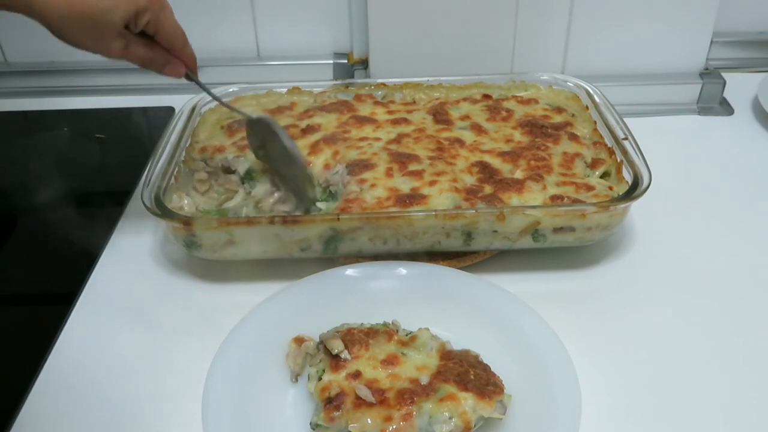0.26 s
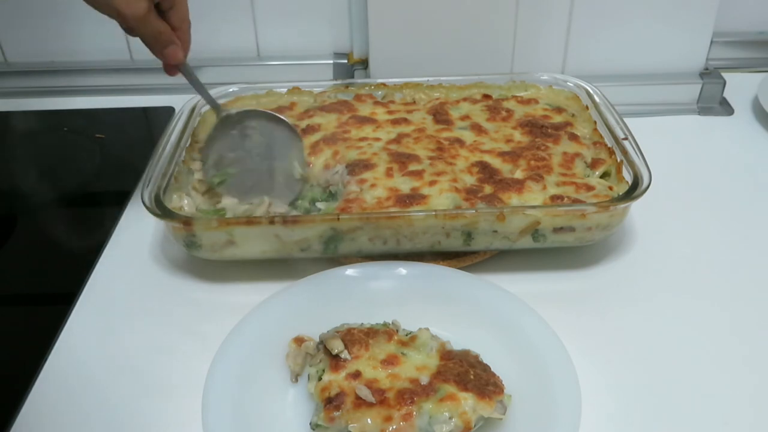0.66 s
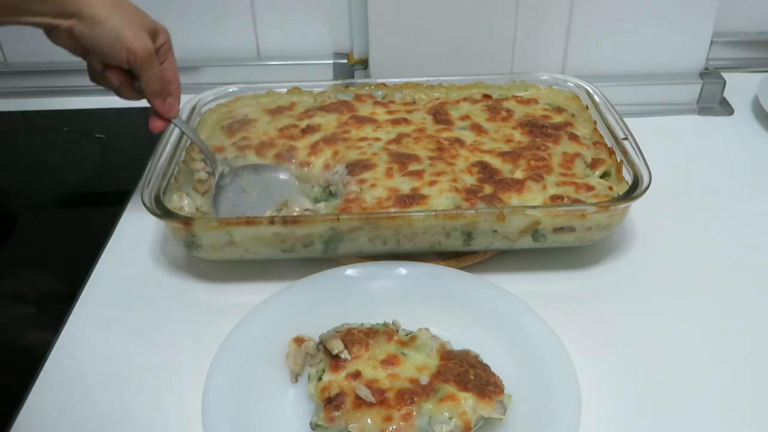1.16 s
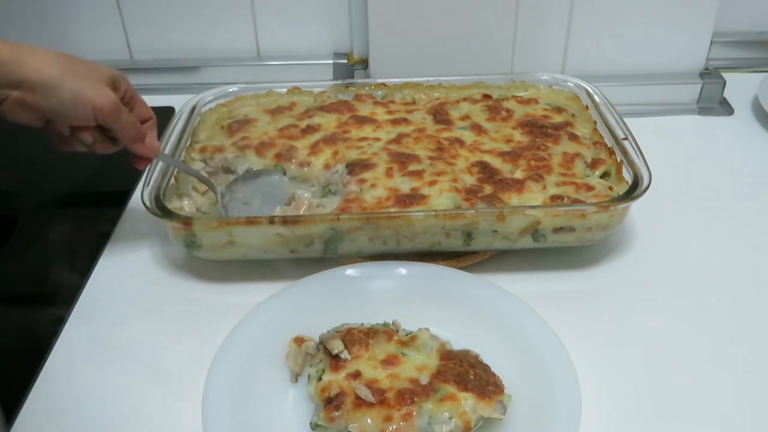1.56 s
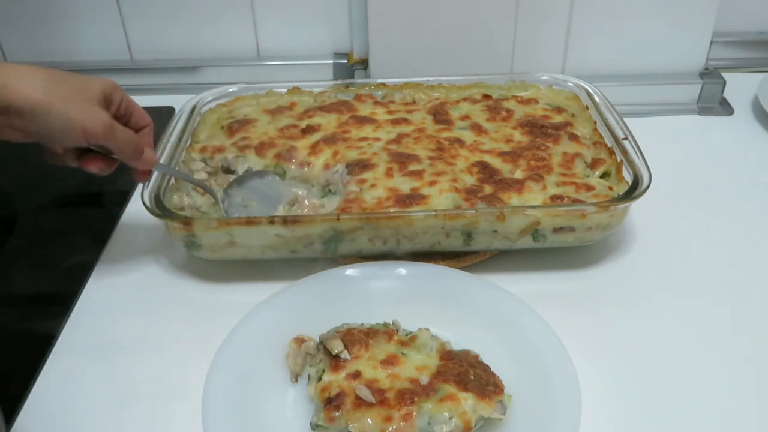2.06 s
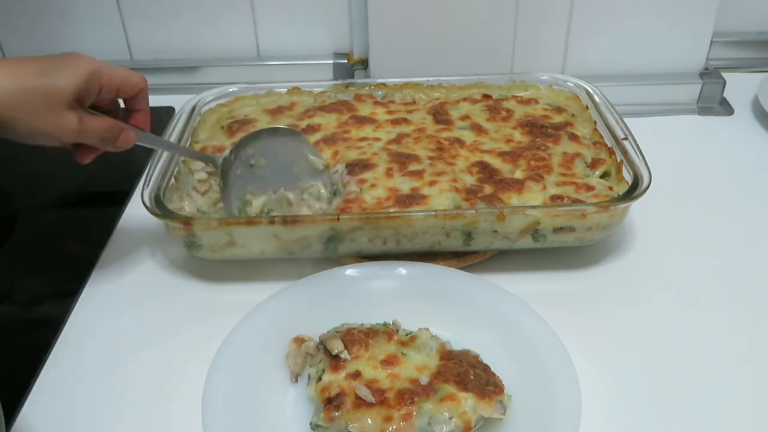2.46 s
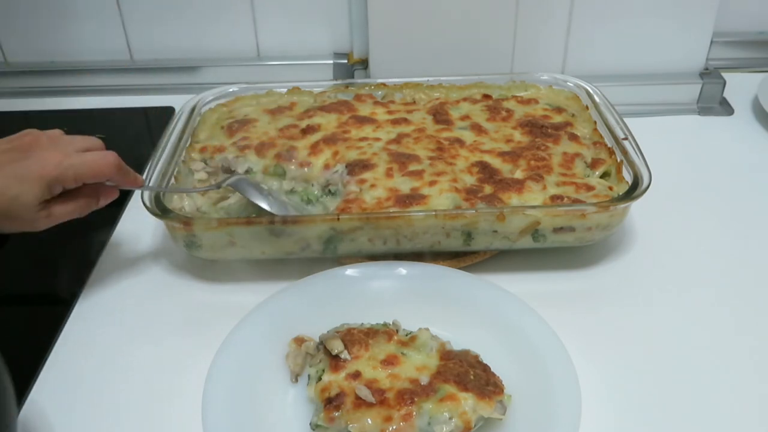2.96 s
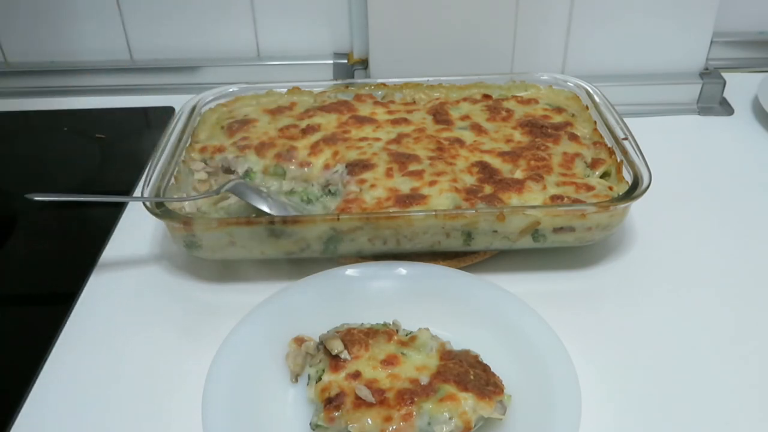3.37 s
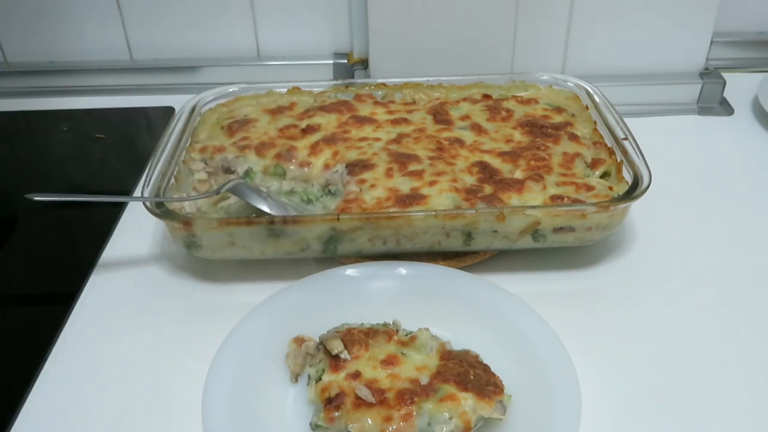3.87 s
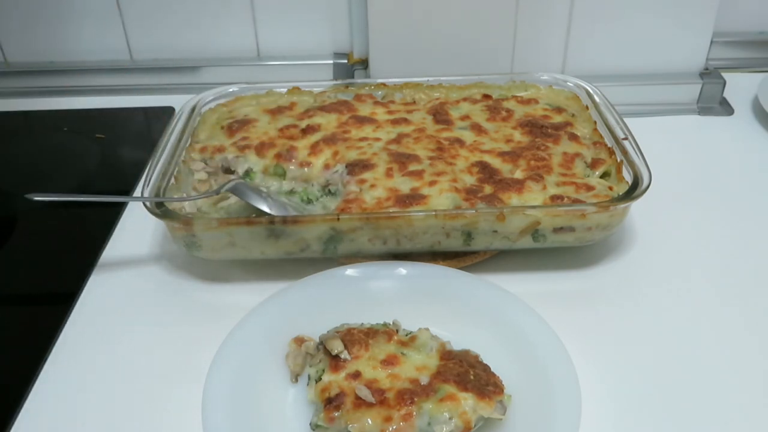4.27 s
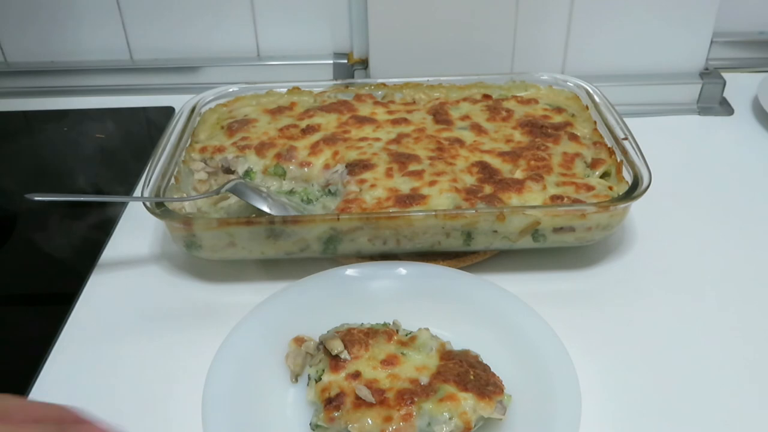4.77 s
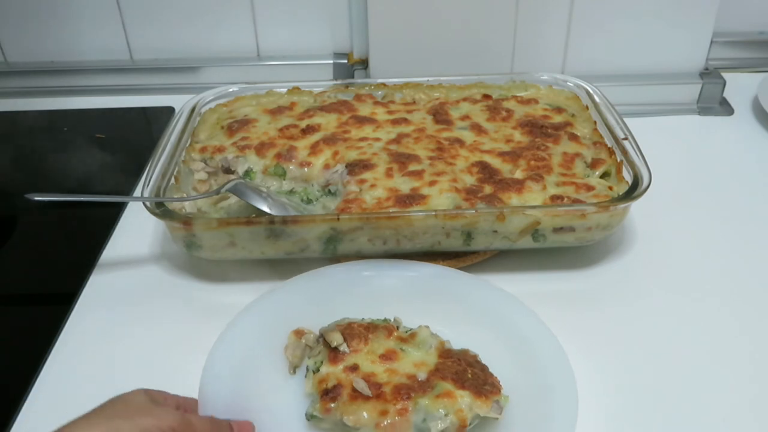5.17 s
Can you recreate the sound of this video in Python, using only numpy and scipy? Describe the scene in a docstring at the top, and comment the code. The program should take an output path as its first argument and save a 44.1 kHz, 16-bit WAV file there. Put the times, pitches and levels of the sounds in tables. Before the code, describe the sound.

A fan or fridge hums low and steady while a metal spoon clinks and scrapes in short strokes inside a glass dish full of food, now and then ringing thinly. The spoon stops, a quick cluster of knocks jolts the worktop, and a plate slides faintly with light touches. Everything is heard from close by, with a short bright echo off the kitchen tiles.

```python
"""A small tiled kitchen, heard from a stereo microphone close to the worktop. A fan or fridge hums steadily.
A steel serving spoon knocks on a glass baking dish full of food, scrapes through it and sings with friction.
Later something is set down on the worktop nearby; then a plate slides and is nudged.
The hard walls give every blow a short bright tail, and the recorder's gain ducks after the loud ones."""
import sys
import numpy as np
from scipy import signal
from scipy.fft import rfft, irfft
from scipy.io import wavfile
from scipy.ndimage import uniform_filter1d

SR = 44100
rng = np.random.default_rng(int(sys.argv[2]) if len(sys.argv) > 2 else 0)


def to_wav(s):
    """Save 16-bit WAV."""
    ch = np.atleast_2d(s).T  # columns
    pcm = np.round(np.clip(ch, -1, 1) * 32767)  # PCM
    wavfile.write(sys.argv[1], SR, pcm.astype(np.int16))


N = 238580

# modes of dish and spoon, damped by the food: pitch_hz, level_db, t60_s
DISH_MODES = [(584, -12, 0.099), (610, -1.5, 0.055), (687, 6, 0.024), (875, 1, 0.06), (1016, 1.5, 0.045),
              (1137, 4, 0.031), (1314, 3, 0.023), (1478, 9, 0.019), (1618, 6.5, 0.032), (1803, 1, 0.038),
              (1876, 7.5, 0.027), (2135, -1.5, 0.042), (2650, -11, 0.019), (2586, -6.5, 0.12),
              (2736, 3, 0.023), (3300, -21, 0.014), (3114, 16.5, 0.0076), (3360, 11, 0.014),
              (3515, 19, 0.01), (4070, 3.5, 0.018), (4325, 5, 0.027), (4443, 10, 0.0079),
              (5440, 4.5, 0.033), (5400, -24, 0.0039), (6880, 0, 0.032)]
# modes of the worktop and what stands on it: pitch_hz, level_db, t60_s
WORKTOP_MODES = [(298, -25, 0.11), (370, -20, 0.0068), (487, 10.5, 0.046), (569, -30, 0.0045),
                 (704, 5, 0.026), (834, 11.5, 0.015), (1010, 2, 0.011), (1157, 23.5, 0.0092),
                 (1260, -38, 0.0074), (1650, 13, 0.02), (2170, 12, 0.013), (2570, -16, 0.0052),
                 (3400, -9, .006), (3860, 14.5, 0.008)]


def amp(db):
    """dB to gain."""
    return 10 ** (np.asarray(db) / 20)


def rms_one(x):
    """Scale to rms 1."""
    return x / np.sqrt(np.mean(x ** 2) + 1e-20)


def envelope(points):
    """Gain along a curve of (time_s, level_db), faded to silence at both ends."""
    times, level_db = np.transpose(points)
    t = np.arange(N) / SR
    gate = np.clip(np.minimum(t - times[0], times[-1] + .02 - t) / .02, 0, 1)
    return gate * amp(np.interp(t, times, level_db))


def at_hz(points, hz):
    """Read a spectrum on a log-frequency axis."""
    pitches, values = np.transpose(points)
    return np.interp(np.log(hz), np.log(pitches), values)


def butter(x, order, hz, kind):
    """Butterworth filter."""
    return signal.sosfilt(signal.butter(order, hz, kind, fs=SR, output="sos"), x)


def ring(x, hz, t60):
    """One mode: a unit click sets a sine of height 1 ringing."""
    r, w = amp(-60 / (t60 * SR)), 2 * np.pi * hz / SR
    return signal.lfilter([0, np.sin(w)], [1, -2 * r * np.cos(w), r * r], x + 1e-18)


def stereo_bands(side_db, size):
    """Half-octave noise bands of equal density; side_db sets how much the microphone's ports differ."""
    edges_hz = 30 * 2 ** np.arange(0, 9.6, .5)
    white = rng.standard_normal((2, 2, size))
    for k, (low, high) in enumerate(zip(edges_hz, edges_hz[1:])):
        mid, side = butter(white[k % 2], 2, [low, min(high, .49 * SR)], "band")
        hz = np.sqrt(low * high)
        yield hz, mid + amp(at_hz(side_db, hz)) * side * [[1], [-1]]


def grit(per_s, spread_db):
    """Tiny slips of friction: random clicks of uneven size, rms 1."""
    sizes = amp(spread_db * np.minimum(rng.exponential(1, N), 4)) * rng.choice([-1, 1], N)
    return rms_one(sizes * (rng.random(N) < per_s / SR))


def hum():
    """A fan or fridge: broad air noise, a few droning resonances and slightly wavering motor tones."""
    # air noise spectrum: pitch_hz, density_db
    air_colour = [(18, -38), (50, 0), (72, -4), (100, -3.5), (160, -1), (230, -7), (330, -11), (450, -10.5),
                  (700, -17), (1100, -22.5), (2000, -27), (4000, -33.5), (8000, -41), (12000, -48),
                  (16000, -51)]
    # its stereo width: pitch_hz, side_over_mid_db
    air_side = [(60, -107), (180, -17), (550, -7.5), (1650, -3), (4970, -2), (15000, 0.5)]
    # resonances: pitch_hz, nominal_width_hz, rms_db
    resonances = [(84, 4.3, -53), (215.5, 24.6, -47), (296.1, 9.4, -50.5), (12060, 330, -76.5)]
    # motor tones: pitch_hz, level_db
    motor = [(53.5, -54), (126.6, -43), (153.3, -48), (400.4, -49.5)]
    air = sum(band * amp(at_hz(air_colour, hz)) for hz, band in stereo_bands(air_side, size=N))
    push = rng.standard_normal(N + SR)   # an extra second lets the resonances build up
    drones = sum(amp(db) * rms_one(ring(push, hz, 2.9 / width)[SR:]) for hz, width, db in resonances)
    tones, t = 0, np.arange(N) / SR
    for hz, db in motor:
        steady = np.sqrt(2) * np.sin(2 * np.pi * (hz * t + rng.random()))
        waver = 0.54 * rms_one(ring(push, hz, t60=0.65)[SR:])
        tones = tones + amp(db) * (steady + waver)
    return amp(-41) * rms_one(air) + drones + tones


def blows(events, modes, crack_s, crack_db, scatter_db, scuff, bass_db):
    """Each blow cracks and rings every mode; returns the direct sound and what fills the room."""
    contact_s, thud_hz = 0.0013, 569   # rise of a blow, peak of its dull part
    out, t = np.zeros((2, N)), np.arange(SR // 4) / SR
    hz, level_db, t60 = np.array(modes).T[:, :, None]
    bins_hz = np.arange(1, len(t) // 2 + 2) * SR / len(t)
    for start_s, thud_db, tick_db, tick_hz, fall_db, spot_hz, direct_db in events:
        def drive(f):
            """A dull thud and a bright tick; the struck spot wakes modes near spot_hz most."""
            thud_octaves, tick_octaves = np.log2(f / thud_hz), np.log2(f / tick_hz)
            thud = amp(thud_db + np.minimum(-bass_db * thud_octaves / 2, -9 * thud_octaves))
            tick = amp(tick_db + np.minimum(11 * tick_octaves, -fall_db * tick_octaves))
            spot = amp(9 * np.exp(-(np.log2(f / spot_hz) / 0.084) ** 2))
            return spot * np.hypot(thud, tick)
        strength = drive(hz) * amp(level_db + scatter_db * rng.standard_normal(hz.shape))
        phase = scuff * rng.uniform(0, 2 * np.pi, hz.shape)   # scuffing starts the modes out of step
        body = np.sum(strength * amp(-60 * t / t60) * np.sin(2 * np.pi * hz * t + phase), axis=0)
        # the crack's pitches arrive scattered over about crack_s
        jitter = np.interp(np.sqrt(bins_hz), np.linspace(0, 150, 60), rng.random(60))
        lag_s = contact_s + crack_s * np.sqrt(bins_hz / 2000) * jitter
        smear = np.exp(-2j * np.pi * np.cumsum(lag_s) * bins_hz[0])
        click = irfft(drive(bins_hz) / np.sqrt(bins_hz) * smear, len(t))
        crack = amp(max(thud_db, tick_db) + crack_db) * rms_one(click) * (t < .05)
        blow = (body + crack) * (1 - np.exp(-t / contact_s))
        i = round(start_s * SR)
        out[:, i:i + len(t)] += (blow * amp([[min(direct_db, 0)], [0]]))[:, :N - i]
    return out


def spoon_clinks():
    """Steel strikes glass; the food damps the ring."""
    # blows: start_s, thud_db, tick_db, tick_hz, fall_db_per_octave, spot_hz, direct_db (capped at 0)
    clinks = [(0.553, -33, -11, 1580, 9, 2700, -2.1), (0.718, -38, -19, 1600, 5.5, 4330, 1),
              (1.033, -46, -43.5, 1900, 8, 2700, 0), (1.153, -23, -24, 1680, 5.5, 3800, -0.8),
              (1.349, -33.5, -39.5, 1100, 13, 1010, -11), (1.568, -34.5, -40.5, 1110, 7.5, 1010, -8),
              (2.029, -31.5, -37, 1070, 5, 1010, -1.2), (2.632, -50, -31.5, 1590, 10.5, 1500, -3),
              (2.857, -19.5, -12.5, 1710, 2.5, 1030, 0), (3.15, -31, -19, 1050, 2, 1724, -5)]
    return blows(clinks, DISH_MODES,
                 crack_s=0.001585, crack_db=-13.5, scatter_db=2.5, scuff=0.95, bass_db=-16)


def swell(start_s, rise_s, hold_s, db, lift_s=0.052):
    """Gain of one stroke: it swells, holds and dies as the spoon lifts."""
    full_s, faint_db = start_s + rise_s, db - 15.5
    release_s = full_s + hold_s
    return envelope([(start_s, faint_db), (full_s, db), (release_s, db), (release_s + lift_s, faint_db)])


def spoon_scraping():
    """Dense slips shake the low, middle and high modes of the dish; the wet food hisses above them."""
    # drags over the glass: start_s, rise_s, hold_s, level_db, brightness_db_per_layer
    strokes = [(0.742, 0.038, 0.082, -47, 2.8), (0.925, 0.13, 0.15, -57.5, 7.5), (1.26, 0.028, 0.1, -55, 1),
               (1.557, .025, 0.031, -63, -4), (1.668, 0.021, 0.075, -49, -2),
               (1.853, 0.033, 0.032, -54.5, -3), (1.945, .055, .03, -54.5, -7),
               (2.156, 0.057, .05, -49.5, -4), (2.372, 0.083, 0.018, -40, -2.5),
               (2.463, 0.037, 0.05, -49.5, 6), (2.607, 0.047, 0.13, -36, -10.5),
               (2.778, 0.068, .022, -42.5, 0)]
    # layers at brightness 0: grinding_db, rubbing_db, rasp_db, hiss_db
    layers_db = [-10, -2.5, -4.5, -12.5]
    *gains, hiss_gain = sum(swell(*stroke) * amp(layers_db + bright_db * np.arange(-1, 3))[:, None]
                            for *stroke, bright_db in strokes)
    slips = grit(3500, spread_db=2.5)
    out = hiss_gain * rms_one(butter(grit(3500, spread_db=3), 2, [5000, 15000], "band"))
    bands_hz = [(600, 1250), (1250, 2200), (2200, 4000)]
    t60_scales = [.45, .6, .3]   # pressure damps the ring
    for (low, high), gain, t60_scale in zip(bands_hz, gains, t60_scales):
        body = sum(amp(db) * ring(slips, hz, t60_scale * t60) * (-1) ** k
                   for k, (hz, db, t60) in enumerate(DISH_MODES) if low < hz < high)
        out = out + gain * rms_one(body)
    return out


def spoon_singing():
    """Fine friction keeps narrow modes of the dish and the spoon sounding while it slides."""
    # along the wall, over the rim, down into the corner: start_s, rise_s, hold_s, level_db
    strokes = [(0.928, 0.11, 0.128, -40), (2.382, 0.1, .14, -37.5), (2.728, 0.091, 0.035, -45)]
    # singing modes, one list a stroke: pitch_hz, width_hz, level_db
    stroke_modes = [
        [(1790, 57, -7), (2710, 34, -19), (4470, 310, -16), (6950, 200, -18)],
        [(1310, 38, -15), (1890, 74, -17), (2072, 22, 1), (3230, 110, -19), (3680, 1100, -15),
         (5100, 130, -12.5), (6930, 110, -16), (10200, 300, -27)],
        [(2650, 39, 1.5), (3080, 52, 4), (4530, 200, -3.5), (6960, 250, -13)],
    ]
    out, friction = 0, grit(2500, spread_db=4)
    for stroke, modes in zip(strokes, stroke_modes):
        song = sum(amp(db) * rms_one(ring(friction, hz, 2.2 / width)) for hz, width, db in modes)
        out = out + swell(*stroke, lift_s=0.021) * song
    return out


def worktop_knocks():
    """Something set down nearby jolts the worktop and what stands on it."""
    # blows: start_s, thud_db, tick_db, tick_hz, fall_db_per_octave, spot_hz, direct_db
    knocks = [(3.48, -52, -41.5, 2300, 11.4, 2150, -7.5), (3.689, -38.5, -37.5, 1830, 14, 1230, -11),
              (4.257, -9.5, -25.5, 3030, 3.4, 570, -2.2), (4.319, -18.5, -33, 2800, 4.9, 810, -5),
              (4.454, -21, -21.5, 2050, 12.9, 1250, -9.5), (4.674, -43.5, -36.5, 1940, 22, 970, -24.5),
              (5.138, -39.5, -63, 2400, 6, 670, -14), (5.359, -35.5, -57, 2200, 6.1, 370, -4)]
    return blows(knocks, WORKTOP_MODES,
                 crack_s=0.001, crack_db=-9, scatter_db=-1.0, scuff=0.22, bass_db=-18)


def plate_sliding():
    """The plate's foot grates on the worktop and shakes its modes, damped by the contact."""
    # course of the slide: time_s, level_db
    slide = [(4.9, -76), (5.118, -63), (5.364, -46.5), (5.41, -58)]
    slips = grit(1200, spread_db=5)
    grating = sum(amp(db + 1.7 * np.log2(hz / 500)) * ring(slips, hz, 0.33 * t60)
                  for hz, db, t60 in WORKTOP_MODES)
    return envelope(slide) * rms_one(grating)


def plate_nudges():
    """Two light touches set the plate ringing."""
    # blows: start_s, thud_db, tick_db, tick_hz, fall_db_per_octave, spot_hz, direct_db
    nudges = [(5.193, -33.5, -35.5, 1190, 5.7, 800, -7), (5.219, -42, -35.5, 1000, 6.9, 1110, -1.5)]
    # modes of the plate: pitch_hz, level_db, t60_s
    modes = [(810, -10, 0.021), (1128, 4, 0.025), (1480, -11, 0.041), (1906, -2, 0.088), (2590, 2, 0.028),
             (3700, 9, 0.044), (4500, 8, 0.04), (5100, -9, 0.032), (6300, 2, 0.089)]
    return blows(nudges, modes, crack_s=0.00507, crack_db=-9.5, scatter_db=1.0, scuff=0.72, bass_db=-11)


def kitchen_echo(x):
    """Dense reflections from the tiles: noise that dies band by band."""
    # decay of the room: pitch_hz, t60_s
    decay = [(300, 0.24), (1000, 0.35), (3000, 0.34), (6000, 0.32), (14000, 0.31)]
    # colour of the tail: pitch_hz, level_db
    colour = [(200, 5), (600, 4), (2000, 5.5), (5000, 3), (9000, -1.5), (14000, -8.5)]
    # its stereo width: pitch_hz, side_over_mid_db
    side = [(60, -37), (180, -27), (550, -28), (1650, -20), (4970, -7), (15000, 2.5)]
    room_db, onset_s = -6, 0.0017
    t = np.arange(SR // 2) / SR
    echo = sum(band * amp(at_hz(colour, hz) - 60 * t / at_hz(decay, hz))
               for hz, band in stereo_bands(side, size=len(t)))
    echo = echo * np.clip(t / onset_s, 0, 1) ** 2
    echo = amp(room_db) * echo / np.sqrt(np.sum(echo ** 2) / 2)
    return signal.fftconvolve(x[None], echo, axes=1)[:, :N]


def scene():
    """At the microphone: the close sounds, their echo off the tiles and the hum."""
    hits = spoon_clinks() + worktop_knocks() + plate_nudges()
    direct, to_room = hits + spoon_scraping() + spoon_singing() + plate_sliding()
    port_lag_s = 1.6e-5   # close sounds reach the left port first
    hz = np.arange(N // 2 + 1) * SR / N
    port_shift = np.exp(1j * np.pi * hz * port_lag_s * np.array([[1], [-1]]))
    return irfft(rfft(direct) * port_shift, N) + kitchen_echo(to_room) + hum()


def record(dry):
    """The recorder ducks after loud blows and recovers; lowest bass, peaks and top treble are cut."""
    threshold_db, squeeze, recover_db_per_s = -27, 0.15, 33
    level_db = 10 * np.log10(uniform_filter1d(np.mean(dry ** 2, axis=0), size=441) + 1e-9)
    recovery_db = recover_db_per_s * np.arange(N) / SR
    held_db = np.maximum.accumulate(level_db + recovery_db) - recovery_db
    excess_db = np.maximum(held_db - threshold_db, 0)
    duck_db = signal.lfilter([.004], [1, -.996], -squeeze * excess_db)   # eases in over about 6 ms
    lean = butter(dry * amp(duck_db), 10, 48, "high")
    soft = butter(lean, 6, 15200, "low")
    top_cut = signal.cheby2(12, 70, 16400, fs=SR, output="sos")
    return signal.sosfilt(top_cut, np.clip(soft, -.93, .93))


dry = scene()
out = record(dry)
to_wav(out)
```